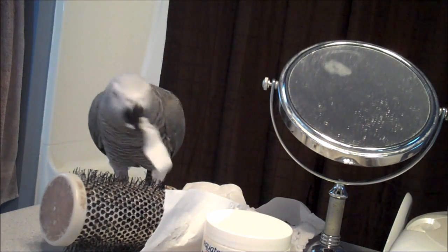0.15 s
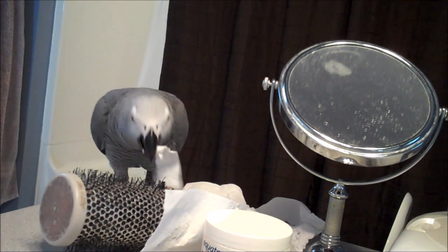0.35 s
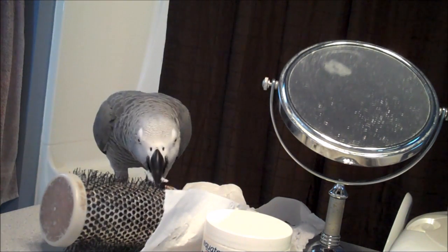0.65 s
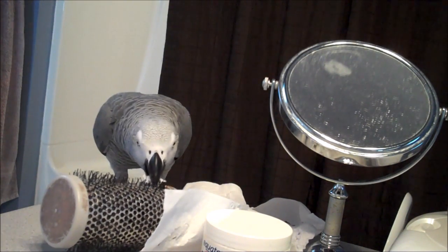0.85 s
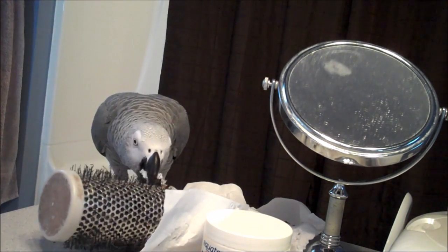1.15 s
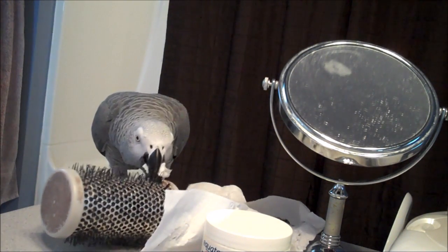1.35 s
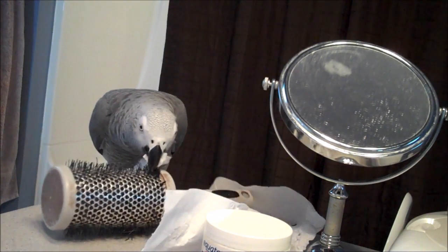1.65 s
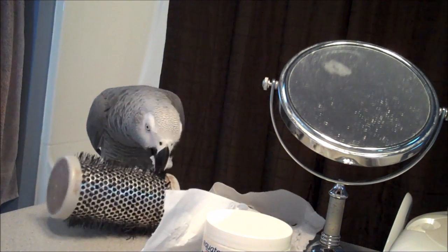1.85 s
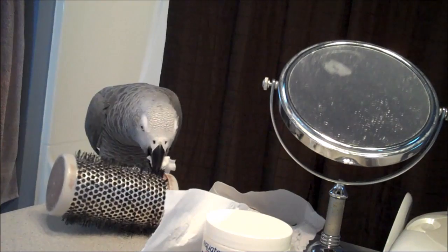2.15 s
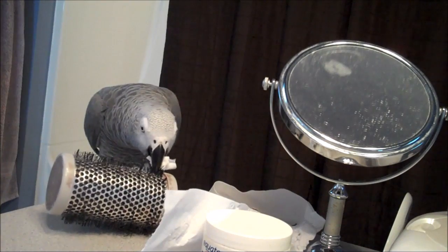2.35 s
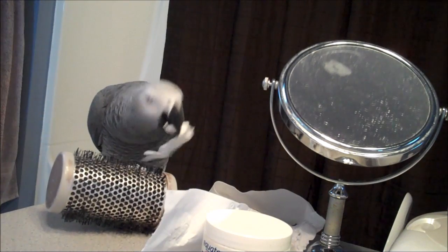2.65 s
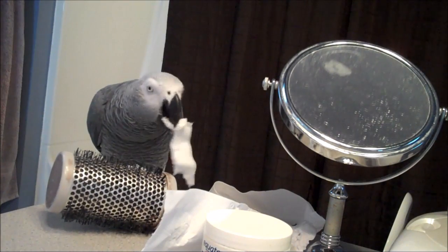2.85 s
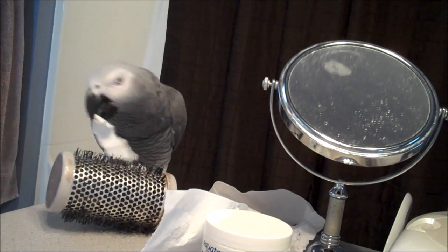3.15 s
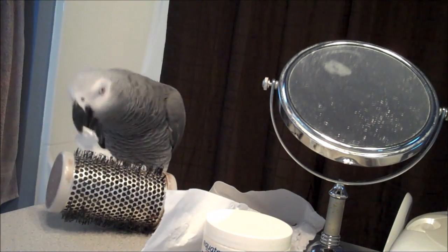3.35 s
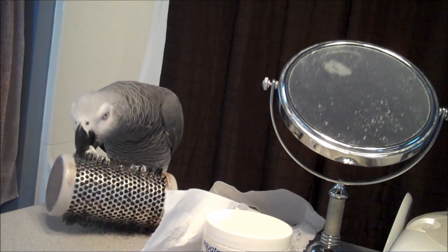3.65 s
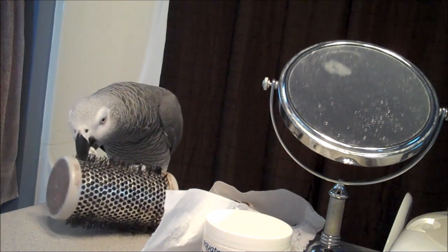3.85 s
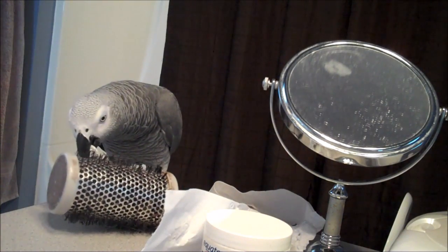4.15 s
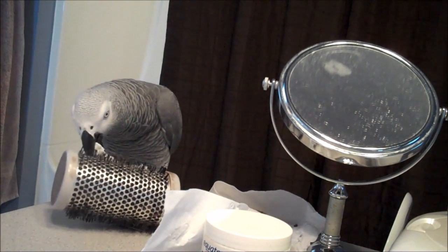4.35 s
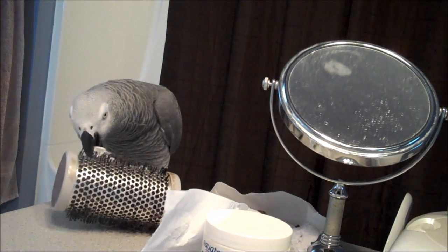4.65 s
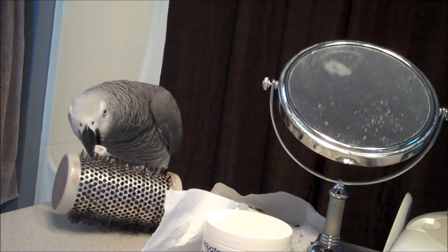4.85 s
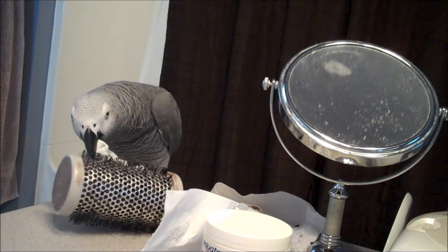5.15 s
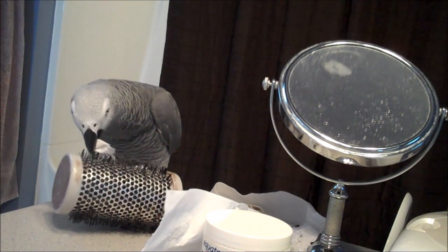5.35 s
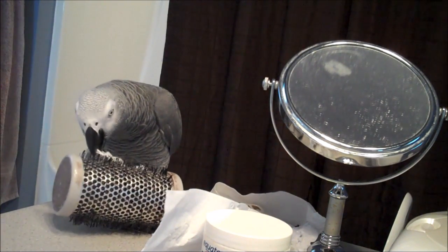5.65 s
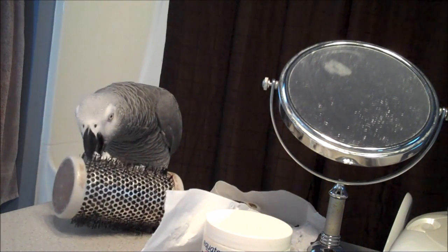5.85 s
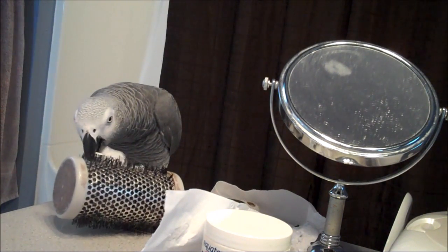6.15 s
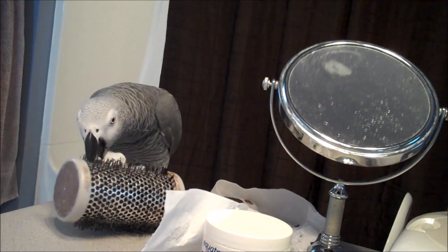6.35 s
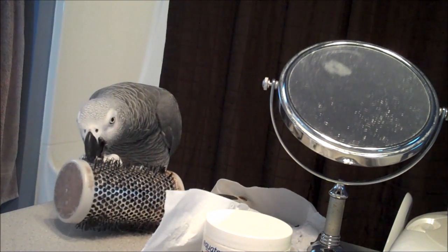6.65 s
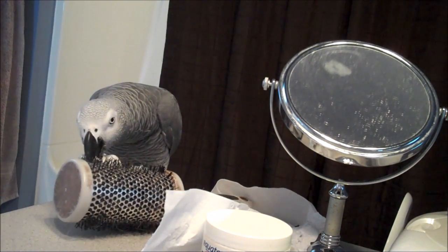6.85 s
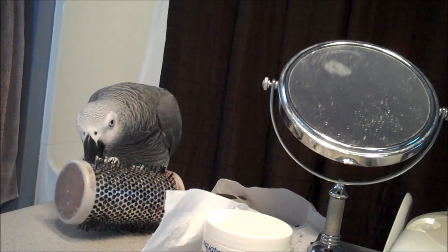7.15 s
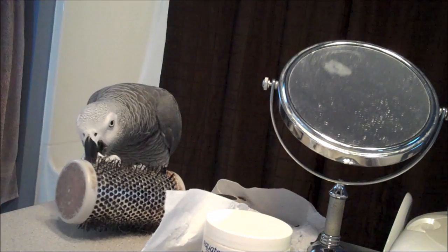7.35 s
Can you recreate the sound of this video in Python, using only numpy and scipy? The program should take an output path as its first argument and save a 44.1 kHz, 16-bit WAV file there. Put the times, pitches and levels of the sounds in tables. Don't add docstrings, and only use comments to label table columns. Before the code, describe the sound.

Crisp paper rustling, sharp bristle snaps and one hard ringing brush slam, followed by quiet beak nibbling and ticks in a small tiled bathroom.

```python
import sys
import numpy as np
from scipy import signal
from scipy.io import wavfile
from scipy.ndimage import uniform_filter1d

SR = 44100
rng = np.random.default_rng(int(sys.argv[2]) if len(sys.argv) > 2 else 0)


def store_pcm(level_fs):
    pcm = np.round(np.clip(level_fs, -1, 1) * 32767).astype(np.int16)
    wavfile.write(sys.argv[1], SR, np.atleast_2d(pcm).T)


def gain_from_db(level_db):
    decades = np.asarray(level_db, float) / 20
    return 10 ** decades


N = 331632
EDGE_HZ = 14330
HALF_LR = np.array([[.5], [-.5]])


def evened(x):
    return x / np.sqrt(np.mean(x ** 2) + 1e-20)


def read(points, hz):
    f, value = np.transpose(points)
    return np.interp(np.log(hz + 1), np.log(f + 1), value)


def add(mix, start_s, sound):
    part = mix[..., round(start_s * SR):][..., :sound.shape[-1]]
    part += sound[..., :part.shape[-1]]


def resonate(x, hz, width_hz):
    turn = np.exp(2j * np.pi * np.cumsum(hz * np.ones(len(x))) / SR)
    r = np.exp(-np.pi * width_hz / SR)
    return 2 * (turn * signal.lfilter([1 - r], [1, -r], x / turn)).real


def colour(x, points, share):
    hz = abs(np.fft.fftfreq(2048, 1 / SR))
    log_gain = share * read(points, hz) * np.log(10) / 20
    taps = np.fft.ifft(np.exp(np.conj(signal.hilbert(log_gain)))).real[:1024]
    return signal.oaconvolve(x, taps)[:N]


def crackle(count, per_s, spread_db):
    size_db = spread_db * np.minimum(rng.exponential(1, count), 4)
    size = gain_from_db(size_db) * rng.choice([-1., 1.], count)
    return evened(size * (rng.random(count) < per_s / SR))


def strokes(rows, fall_db_per_s):
    start, rise, hold, db, shade = np.transpose(rows)[:, :, None]
    step_s = .002
    t = np.arange(0, N / SR + step_s, step_s)
    age = t - start
    up = np.clip(age / np.maximum(rise, step_s), 0, 1)
    fall_db = fall_db_per_s * np.maximum(age - rise - hold, 0)
    power = gain_from_db(2 * (db - 13.5 * (1 - up) - fall_db)) * np.minimum(4 * up, 1)
    total = power.sum(0) + 1e-30
    curves = np.sqrt(total), (power * shade).sum(0) / total
    return [np.interp(np.arange(N) / SR, t, v) for v in curves]


def pings(rows):
    out, t = np.zeros(N), np.arange(4000) / SR
    for s, db, hz, t60_s in rows:
        rise_s = min(0.00037, t60_s / 20)
        tone = gain_from_db(db - 60 * t / t60_s) * np.sin(2 * np.pi * hz * t)
        add(out, s, tone * (1 - np.exp(-t / rise_s)))
    return out


# (frequency [Hz], density [dB per Hz])
HISS = [(25, -18), (63, -6.5), (140, -9.5), (231, -7), (1000, -12.5), (4600, -17.5), (11000, -21.5),
        (14000, -24)]
# (frequency [Hz], left-right [dB])
HISS_LEAN = [(60, 0.5), (180, 4.9), (550, 8.7), (1650, 6.4), (4970, 4.4), (15000, 0.35)]
# (frequency [Hz], likeness [0-1])
HISS_SAME = [(60, 0.1), (240, 0.24), (950, 0.012), (3770, 0.011), (15000, 0.0067)]


def hiss():
    hz = np.fft.rfftfreq(2048, 1 / SR)
    a, b, c, d = rng.standard_normal((N // 512 + 5, len(hz), 4)).T
    same = np.clip(read(HISS_SAME, hz), -1, 1)[:, None]
    left = a + 1j * b
    z = np.array([left, same * left + np.sqrt(1 - same ** 2) * (c + 1j * d)])
    z[:, hz > EDGE_HZ] = 0
    z *= gain_from_db(read(HISS, hz) + HALF_LR * read(HISS_LEAN, hz))[:, :, None]
    noise = evened(signal.istft(z, nperseg=2048, noverlap=1536)[1][:, :N])
    hum_hz = 59.5
    hum = np.sin(2 * np.pi * hum_hz * np.arange(N) / SR)
    waver = np.array([evened(resonate(v, hum_hz, 7.9)) for v in rng.standard_normal((2, N))])
    return gain_from_db(-60.0) * noise + gain_from_db(-70.5) * hum + gain_from_db(-79.5) * waver


# (frequency [Hz], t60 [s])
TILES = [(150, 0.5), (600, 0.31), (2000, 0.34), (6000, 0.11), (12000, 0.13)]


def bathroom(x):
    taps = np.zeros((2, SR // 2))
    slots = np.arange(160, SR // 2 - 20, 20)
    at = slots + rng.integers(0, 20, (2, len(slots)))
    np.put_along_axis(taps, at, rng.choice([-1., 1.], at.shape), 1)
    bass = signal.lfilter([.15], [1, -.85], taps, axis=1)
    taps = taps - bass + (bass + bass[::-1]) * 0.61
    hz, t, z = signal.stft(taps, SR, nperseg=256)
    decay = gain_from_db(-60 * t / read(TILES, hz)[:, None])
    tail = signal.istft(z * decay, SR, nperseg=256)[1]
    return signal.fftconvolve(x[None], tail / np.linalg.norm(tail[0]), axes=1)[:, :N]


# (frequency [Hz], level [dB], t60 [s])
COUNTER = [(143.5, -3.5, 0.083), (191, -10, 0.072), (221.8, 2, 0.16), (336, 0.5, 0.054), (406, -4, 0.06),
           (445, -1.5, 0.11), (467.6, 3, 0.079), (532, -6, 0.071), (568, 10.5, 0.035), (650.6, -4, 0.11),
           (722, -11.5, 0.1)]
# (frequency [Hz], level [dB], t60 [s])
BARREL = [(910, -9, 0.12), (965, 4, 0.061), (1046, 2, 0.05), (1150, -1, 0.058), (1233, -9.5, 0.073),
          (1510, -22, 0.04), (1570, -21, 0.06), (1960, -6, 0.034), (2410, -7, 0.03)]


def ring(thud_db, knock_db, octaves, clack_db, damping, luck):
    hz, db, t60_s = np.transpose(COUNTER + BARREL)[:, :, None]
    t = np.arange(9000) / SR
    spot_db = -9 * (np.log2(hz / 128) - octaves) ** 2
    upper_db = np.where(hz < 830, knock_db - 2.0 + spot_db, clack_db - 6.0)
    group_db = thud_db + np.where(hz < 300, 0, upper_db)
    swing = -np.sin(2 * np.pi * (hz * t + .15 * luck[0]))
    level_db = group_db + db + 1.0 + 7.0 * luck[1] - 60 * t * damping / t60_s
    return (gain_from_db(level_db) * swing).sum(0) * (1 - np.exp(-t / 0.0018))


# (time [s], thud [dB], knock re thud [dB], struck spot [octaves over 128 Hz], damping [x])
KNOCKS = [(.668, -36, 11.5, 3, 1.6), (.779, -58, 9.5, 2.34, 1.2), (.835, -46, 10, 3, 1.18),
          (1.058, -46, -4, 1.2, 1.2), (1.163, -44.5, 1.5, 2.16, 0.76), (1.198, -33, -2.5, 1.5, 2.5),
          (1.224, -56, 5, 1.5, 2), (1.306, -43, -7, 2.5, 3.6), (1.8522, -25, 10, 2.5, 2.1),
          (1.873, -43, 16.5, 1, 2.6), (1.894, -37.5, 17, 2.5, 2.9), (1.906, -39, 12, -3, 2.5),
          (1.946, -45, 14, 2.5, 1.8), (2.143, -55.5, -7.5, 2.1, 1.4), (2.284, -44, -1.5, 1, 0.64),
          (2.323, -43.5, 1, 2.5, 3), (2.368, -32.5, -2, 2.16, 4.3), (2.455, -48.5, -7.5, -2.5, 1.4),
          (4.336, -35, 7.5, 2.5, 2.7), (4.345, -37.5, 8.5, 2.0, 2), (6.239, -47, -9, -0.5, 2.6),
          (6.492, -47.5, -4, 8, 2.1)]
# (time [s], level [dB], damping [x])
CLACKS = [
    (1.852, -10.5, 2.26),
    (2.774, -47, 2.3),
    (4.849, -57, 1.8),
]


def knocks():
    out = np.zeros(N)
    blows = [(s, db, knock_db, spot, knock_db - 15, damping) for s, db, knock_db, spot, damping in KNOCKS]
    blows += [(s, db - 60, 0, 2, 60, damping) for s, db, damping in CLACKS]
    lucks = rng.random((len(blows), 2, len(COUNTER + BARREL), 1)) - .5
    for (s, *blow), luck in zip(blows, lucks):
        add(out, s, ring(*blow, luck))
    return out


# (start [s], rise [s], hold [s], thud [dB], knock re thud [dB])
ROLLS = [
    (.69, .02, 0.44, -77, 9.5),
    (1.17, 0.091, 0.032, -46.5, 3.5),
    (1.4, 0.019, 0.17, -70, 8.5),
    (1.9, 0.025, 0.38, -71.5, 3.5),
    (2.27, 0.074, 0.12, -57.5, -2),
    (3.56, 0.042, 0.25, -66, -1.5),
    (4.17, 0.15, 0.032, -57, 1),
    (4.6, .1, 0.34, -79.5, 10),
    (6.1, 0.088, 0.37, -72, 3),
    (6.8, 0.18, 0.46, -74, -2),
]


def rolling():
    thud, knock_db = strokes(ROLLS, fall_db_per_s=114)
    bumps = crackle(N, 500, 2.3)
    low = signal.oaconvolve(bumps, ring(0, -83.0, 2.2, -86, 1.4, [0, 0]))[:N]
    high = signal.oaconvolve(bumps, ring(-90, 80.7, 2.55, 79.9, 2.7, [0, 0]))[:N]
    boom = resonate(resonate(bumps, 120, 48), 120, 48)
    return gain_from_db(-2.0) * thud * (evened(low) + gain_from_db(knock_db) * evened(high) - gain_from_db(-7.5) * evened(boom))


# (time [s], peak [dB],
# pitch [Hz], t60 [s])
PINGS = [(.6685, -34, 610, .04), (.67, -42, 910, .04), (.679, -50, 760, 0.042), (.684, -60, 1150, .03),
         (.75, -48, 470, .08), (.669, -51, 1603, .03), (.689, -49, 595, 0.045), (.701, -41, 645, 0.054),
         (.712, -47, 485, 0.051), (.737, -53, 680, .05), (.784, -46, 556, .05), (.815, -46, 540, 0.044),
         (.836, -37.5, 670, 0.048), (.87, -54, 690, 0.04), (1.8525, -18, 1900, 0.016),
         (1.853, -30, 2160, 0.015), (1.853, -28, 3700, .015), (1.862, -40, 1890, .03),
         (1.8525, -29, 2860, 0.021), (1.8527, -20, 5170, 0.017), (1.8527, -29, 7200, .04),
         (1.8527, -19.5, 8100, 0.013), (1.8545, -18, 585, 0.046), (1.855, -33, 745, .06),
         (1.872, -30, 1195, .03), (1.881, -44, 860, 0.035), (1.907, -39, 1300, 0.023),
         (1.895, -35, 1900, 0.017), (2.383, -51, 594, 0.037), (2.405, -45, 450, 0.044),
         (2.425, -56, 550, .04), (2.457, -47.5, 413, 0.061), (2.48, -51, 445, 0.054),
         (4.337, -39.5, 1790, 0.012), (4.338, -40, 930, 0.036), (4.338, -50, 2300, 0.012),
         (4.345, -46, 2100, 0.02), (4.367, -49, 560, .04), (4.376, -54, 453, 0.032),
         (4.387, -50, 420, 0.044), (4.425, -52, 446, .04), (4.399, -53, 507, 0.036),
         (5.745, -57, 2810, .02), (6.207, -53, 2600, .015),
         (1.8528, -24, 1020, .03), (1.856, -26, 513, 0.046), (1.865, -36, 900, 0.025),
           (1.871, -32, 550, .04), (1.88, -41, 704, 0.022), (1.905, -30, 617, 0.036),
           (1.916, -35, 554, 0.042), (1.9475, -30, 640, 0.035), (1.9485, -40, 950, .025),
           (1.952, -35, 470, 0.045), (1.97, -40, 654, 0.06), (2.021, -50, 576, .05),
           (4.3503, -35, 410, .04), (4.386, -42, 320, 0.054), (6.508, -46, 298, 0.031),
           (6.517, -52, 330, .04), (6.526, -56, 280, 0.046), (6.553, -58, 330, 0.045),
           (6.4945, -54, 1500, .012), (2.7745, -50, 1630, .025), (6.494, -46, 133, 0.16),
           (1.301, -33, 2100, .012), (1.2295, -39, 2000, .012)]


def brush():
    sound = knocks() + rolling() - pings(PINGS)
    return signal.sosfilt(signal.butter(3, 100, "high", fs=SR, output="sos"), sound)


# (time [s], peak [dB], pitch [Hz], left-right [dB], ring [dB])
SNAPS = [(0.8027, -40.5, 7550, -8, 12), (0.8307, -42, 6560, 6, 23), (0.836, -38, 7440, -15, 13),
         (0.924, -35, 7230, -2, 31), (1.091, -36, 7700, -1, 19), (1.1621, -23, 7640, 8.5, 8),
         (1.1665, -36, 7780, 2, 10), (1.181, -24.5, 6300, -2, 13), (1.1955, -21, 7800, 16, 14),
         (1.228, -26, 7600, -8, 15), (1.232, -30, 6150, 9, 6), (1.2387, -18.5, 7650, 8, 30),
         (1.2996, -29.5, 7750, 5, 6), (1.4768, -33.5, 7400, 5, 10), (1.9724, -36, 6500, -2, 38),
         (2.329, -27, 7800, 8, 15), (2.4566, -31.5, 6800, -2, 27), (7.2946, -37, 7240, 2, 0)]
# (time [s], peak [dB], pitch [Hz], length [ms], ring [dB])
CRACKS = [(1.2537, -27, 4800, 1.3, 14), (1.27, -34, 4500, 1.4, 6), (1.313, -29, 5270, 1.6, 6),
          (1.348, -32.5, 5240, 0.8, 6), (1.852, -17, 1980, 1.4, 5), (2.262, -41, 7360, 1.7, 21),
          (2.2792, -30, 4550, 1.9, 14), (2.2853, -26, 7530, 2.4, 21), (2.323, -26, 6540, 1.9, 13),
          (2.3575, -35, 4640, 2.0, 7), (2.775, -45, 5460, 0.59, 10), (2.856, -48, 5600, 0.94, 6),
          (3.611, -43, 3920, 1.6, -5), (4.848, -42, 1650, 2.2, 26), (6.4943, -26, 3800, 0.78, 13)]
# (time [s], peak [dB], pitch [Hz])
TICKS = [(0.3272, -49, 6500), (0.484, -49, 7650), (0.6682, -38, 8000), (0.713, -48, 7560),
         (0.9127, -48, 7500), (1.055, -49, 7560), (1.1156, -47, 7700), (1.647, -44, 7250),
         (1.7255, -49, 7400), (2.049, -41, 7970), (2.0704, -38.5, 7350), (3.845, -41, 8150),
         (4.2562, -45, 7450), (4.336, -45, 6900), (4.3827, -45, 5130), (4.6918, -42.5, 7170),
         (4.729, -44, 6700), (4.753, -41, 7500), (4.778, -44, 6400), (4.927, -38.5, 7800),
         (4.9696, -60, 7150), (5.206, -40.5, 4830), (5.3235, -39, 6760), (5.487, -52, 7360),
         (5.572, -39, 6300), (5.7424, -48.5, 7100), (5.8048, -45.5, 7800), (6.205, -43, 7940),
         (7.3335, -41.5, 6300), (7.3494, -43, 6300)]
# (time [s], peak [dB], pitch [Hz])
FLICKS = [
    (2.0476, -41, 1570),
    (3.59, -48, 2070),
    (3.61, -36.5, 2540),
    (3.702, -44.5, 3000),
    (3.8595, -48, 2800),
    (3.928, -50, 4170),
    (3.952, -53, 2480),
    (6.503, -41, 2590),
    (6.991, -48, 4100),
]


def snaps():
    out, t_ms = np.zeros((2, N)), np.arange(600) * 1000 / SR
    lean_db = 3.5
    rows = [(*snap, 1.23, ring_db) for *snap, ring_db in SNAPS]
    rows += [(s, db, hz, lean_db, ms, ring_db) for s, db, hz, ms, ring_db in CRACKS]
    rows += [(*tick, lean_db, 0.82, 13.5) for tick in TICKS + FLICKS]
    slips = rng.standard_normal((len(rows), len(t_ms), 2)).prod(2)
    for (s, db, hz, lean, ms, ring_db), slip in zip(rows, slips):
        lengths = t_ms / max(ms, .15)
        volley = slip * (1 - np.exp(-lengths / 0.15)) * np.exp(-lengths)
        band_hz = [0.18 * hz, min(5.6 * hz, 12500)]
        volley = signal.lfilter(*signal.butter(1, band_hz, "band", fs=SR), volley)
        volley = signal.lfilter(*signal.butter(2, min(3.3 * hz, .45 * SR), fs=SR), volley)
        sound = volley + gain_from_db(ring_db) * resonate(volley, hz, 0.035 * hz + 500)
        sound *= gain_from_db(db + 2.0) / abs(sound).max()
        add(out, s, sound * gain_from_db(HALF_LR * (lean + 2.5)))
    return out


# (time [s], peak [dB], pitch [Hz])
PRICKS = [(1.1607, -30, 7760), (1.1622, -13, 7800), (1.1626, -22, 5900), (1.1813, -18, 6200),
          (1.1956, -17, 7700), (1.1962, -23, 6300), (1.1815, -25, 7900), (1.2385, -26, 7800),
          (1.2545, -32, 7600), (1.2615, -34, 6240), (1.279, -35, 7900), (1.4537, -40, 7780),
          (1.802, -53, 7350), (2.198, -48, 6000), (2.261, -34, 7500), (2.2795, -24, 7800),
          (2.2868, -25, 4600), (2.327, -22, 7670), (2.327, -24, 5200), (2.3278, -26, 8100),
          (2.3236, -29, 4500), (2.329, -33, 5450), (2.2845, -24, 6900), (2.277, -41, 5540),
          (2.2797, -29.5, 4500), (2.28, -28, 10600), (2.3595, -35, 4500), (2.3572, -28, 8100),
          (3.1134, -45, 6260), (3.2711, -54, 5950), (3.4167, -46, 4780), (3.7036, -47, 6980),
          (3.928, -51, 5900), (4.1775, -49, 7270), (4.4748, -51, 6290), (4.5507, -48, 5170),
          (4.8475, -49, 7280), (5.0475, -50, 7160), (5.1044, -51, 7330), (5.6592, -50, 6280),
          (5.8936, -53, 5000), (5.902, -54, 7660), (5.923, -48, 6800), (5.9809, -45, 8600),
          (5.985, -48, 4500), (6.1156, -47, 6200), (6.1625, -55, 6220), (6.2538, -50, 5770),
          (6.2907, -52, 5500), (6.302, -53, 6500), (6.761, -49, 6790), (6.9891, -53, 6440),
          (7.1358, -48, 7230), (7.308, -42, 7200), (7.308, -42, 5330), (7.3505, -45, 2700),
          (7.2964, -52, 2500), (6.494, -31, 6550), (6.503, -41, 7100), (6.508, -47, 6200),
          (0.443, -52, 7600), (0.803, -45, 7700), (4.7288, -48, 6700), (0.759, -44, 6500),
          (0.808, -46, 7750), (0.866, -49, 7600), (0.897, -50, 7700), (1.3015, -32, 6500),
          (1.3155, -35, 7900)]


def pricks():
    return pings([(*prick, 0.0041) for prick in PRICKS])


# (frequency [Hz], width [Hz])
FOLDS = [
    (7800, 2000),
    (6300, 3100),
    (2550, 4600),
]


def tissue(effort, crease_hz, width_hz, sheet_db, per_s, spread_db, ring_db, clump_db):
    count = len(effort)
    clumps = evened(uniform_filter1d(uniform_filter1d(rng.standard_normal(count), 200), 200))
    ticks = [crackle(count, per_s, spread_db) * gain_from_db(clump_db * clumps) for _ in FOLDS]
    folds = [FOLDS[0], (crease_hz, width_hz), FOLDS[2]]
    rung = [evened(resonate(resonate(v, *fold), *fold)) for v, fold in zip(ticks, folds)]
    fibre, crease, sheet = rung
    sound = ticks[0] + gain_from_db(ring_db) * (gain_from_db(-5.5) * fibre + crease)
    return effort * (sound + gain_from_db(sheet_db + 13.0) * sheet)


# (start [s], hold [s], effort [dB],
# crease pitch [Hz])
NIBBLES = [(0, 0.0036, -54.5, 6460), (0.083, 0.045, -65, 5650), (0.14, 0.12, -67.5, 5460),
           (0.304, .02, -56.5, 6400), (0.372, 0.041, -57.5, 5700), (0.468, 0.049, -52.5, 6300),
           (0.551, 0.036, -53.5, 7860), (0.652, 0.064, -54.5, 7100), (0.784, 0.087, -52, 7170),
           (0.91, 0.049, -52.5, 7300), (1.041, 0.063, -54.5, 7260), (1.723, 0.037, -56.5, 7000),
           (1.967, 0.051, -55.5, 6670), (2.038, 0.028, -52, 7500), (2.132, 0.041, -59, 7300),
           (2.431, 0.039, -53, 6960), (2.576, 0.12, -60, 5500), (2.779, 0.016, -48.5, 5800),
           (2.84, 0.0085, -58.5, 5870), (2.917, 0.079, -57.5, 5350), (3.095, 0.01, -55, 5000),
           (3.116, 0.019, -55, 7400), (3.166, 0.041, -61, 6900), (3.253, 0.065, -57.5, 6600),
           (3.406, 0.059, -57, 6100), (3.584, 0.055, -58.5, 5600), (3.66, 0.13, -64.5, 6700),
         (3.8, 0.054, -60, 5700), (4.016, 0.11, -58, 5620), (4.185, 0.066, -52.5, 6400),
         (4.315, 0.071, -58.5, 6160), (4.46, 0.027, -59.5, 6400), (4.549, 0.12, -56, 5970),
         (4.724, 0.051, -52.5, 6160), (4.83, 0.14, -56.5, 7300), (5.05, 0.091, -61, 6130),
         (5.197, 0.032, -50, 5560), (5.31, 0.077, -59, 6400), (5.437, 0.14, -56, 6600),
         (5.658, 0.15, -61, 6600), (5.882, 0.019, -61, 7000), (5.96, 0.038, -61, 6800),
         (6.104, 0.14, -66.5, 6500), (6.282, 0.17, -59.5, 6770), (6.482, 0.047, -56, 6730),
         (6.963, 0.022, -62, 6560), (7.116, 0.042, -53.5, 6870), (7.277, 0.048, -58, 6860),
         (7.449, .07, -69, 6100)]


def biting():
    rise_s, resting_db = 0.011, -73.5
    bites = [(s, rise_s, *rest) for s, *rest in NIBBLES]
    effort, crease_hz = strokes(bites, fall_db_per_s=236)
    return gain_from_db(-2.2) * tissue(effort + gain_from_db(resting_db), crease_hz, width_hz=2100, sheet_db=-18,
                              per_s=5500, spread_db=2.1, ring_db=5.2, clump_db=2.3)


# (start [s], rise [s], hold [s], effort [dB], sheet re effort [dB])
DRAGS = [
    (1.157, 0.0043, .05, -45, -11.5),
    (1.222, 0.016, 0.04, -34.5, -21),
    (1.195, .003, .008, -45, -17),
    (1.29, 0.016, 0.037, -40, -20),
    (1.38, 0.09, 0.09, -40.5, -17),
    (1.853, .004, 0.0055, -29, -18),
    (2.277, 0.0021, 0.061, -38.5, -47),
    (2.36, .01, 0.044, -56, -33),
]


def tearing():
    effort, sheet_db = (v[:3 * SR] for v in strokes(DRAGS, fall_db_per_s=183))
    torn = tissue(effort, 7050, FOLDS[1][1], sheet_db, per_s=1100, spread_db=1.6, ring_db=-0.58, clump_db=1.5)
    squashed = 1.7 * effort * np.tanh(torn / (1.8 * effort + 1e-9))
    squashed = signal.sosfilt(signal.butter(6, 9700, fs=SR, output="sos"), squashed)
    slam_s = (1.75, 2.2)
    t = np.arange(len(torn)) / SR
    slam = abs(t - np.mean(slam_s)) < np.ptp(slam_s) / 2
    return np.where(slam, squashed, torn)


def rustle():
    out = biting()
    add(out, 0, tearing())
    return out


# (frequency [Hz], density [dB per Hz])
PAPER = [(590, -36), (1050, -14.5), (2120, -4.5), (3480, -8), (4640, 1), (6100, 3), (7710, -0.5),
         (9940, -12.5), (14000, -23)]
# (frequency [Hz], left-right [dB])
SHADE = [(1000, 0.5), (3000, -6), (5000, -1.5), (6200, -0.5), (7700, 8.5), (10000, 15), (15000, 10.5)]


def camera_ports(bright):
    bright = [side + gain_from_db(-12.5) * resonate(side, 7380, 807) for side in bright]
    bright = np.array([colour(side, PAPER[:-1], 0.8) for side in bright])
    ports = np.array([colour(bright[0], SHADE, 0.42), colour(bright[1], SHADE, -0.63)])
    return bright, ports


def scene():
    bright = gain_from_db(-5.5) * rustle() + gain_from_db(4.5) * snaps() + gain_from_db(7.0) * pricks()
    bright, ports = camera_ports(bright)
    wood = brush()
    room = bathroom(gain_from_db(-7.0) * bright.mean(0) + gain_from_db(-9.5) * wood)
    return ports + wood + room + hiss()


def roll_off(x):
    return signal.sosfilt(signal.butter(12, 16470, fs=SR, output="sos"), x)


def record(dry):
    dry = 0.76 * np.tanh(dry / 0.7)
    edge = signal.firwin(401, EDGE_HZ, window=("kaiser", 8), fs=SR)
    below = signal.oaconvolve(dry, edge[None], "same")
    above = signal.sosfilt(signal.butter(10, 15700, fs=SR, output="sos"), dry - below)
    power = above ** 2
    sudden = uniform_filter1d(power, size=128) / (uniform_filter1d(power, size=2048) + 1e-14)
    gate = uniform_filter1d(np.clip(sudden - 4, 0, 1), size=128)
    heard = below + (gain_from_db(-45) + gain_from_db(-8) * gate) * above
    return roll_off(heard)


dry = scene()
out = record(dry)
store_pcm(out)
```